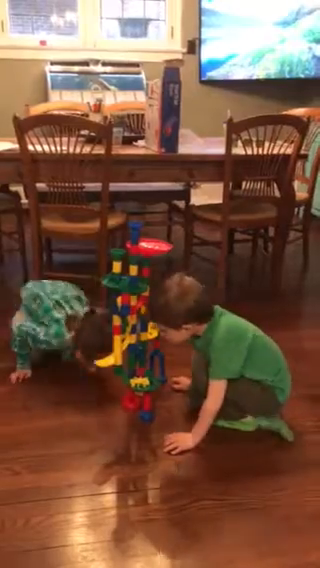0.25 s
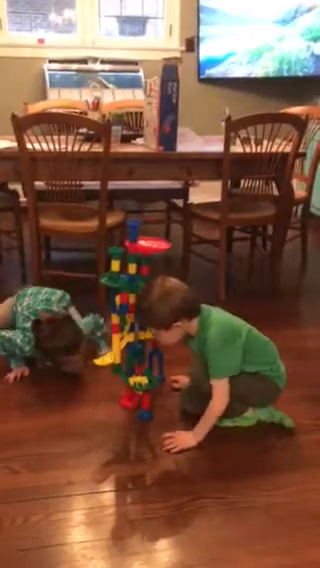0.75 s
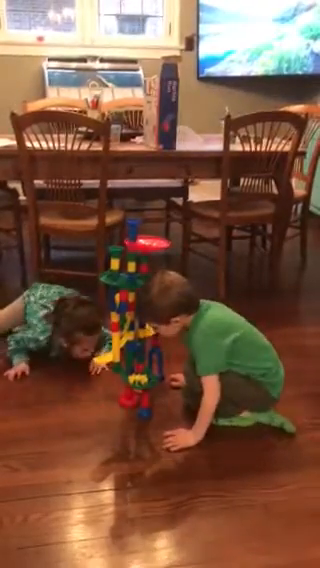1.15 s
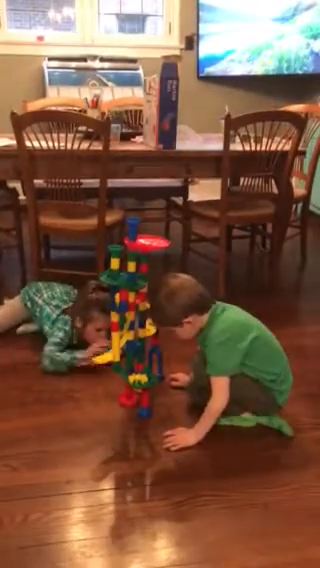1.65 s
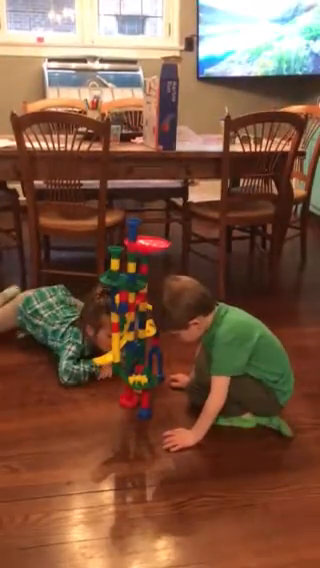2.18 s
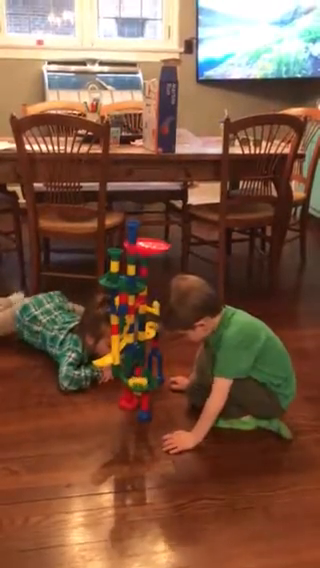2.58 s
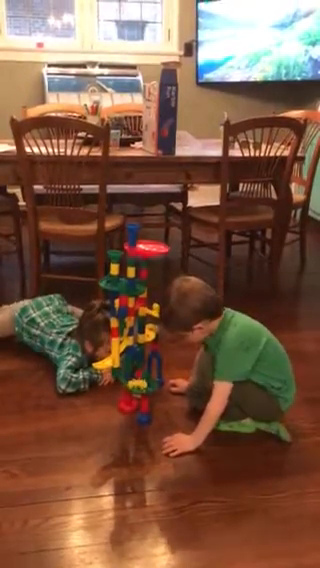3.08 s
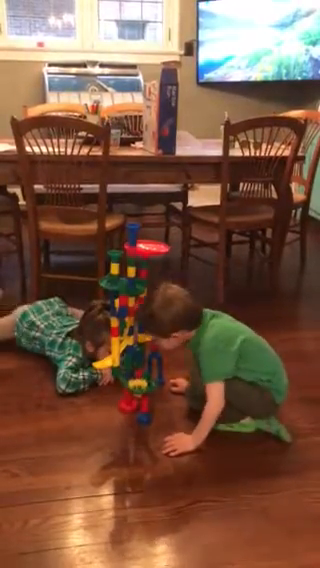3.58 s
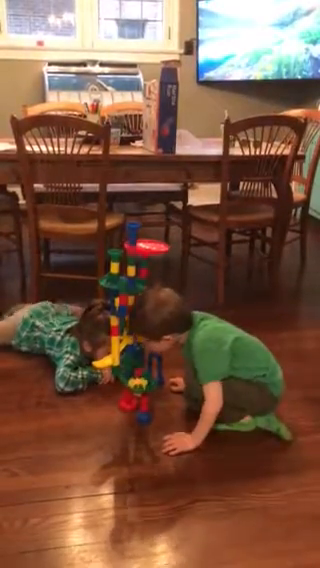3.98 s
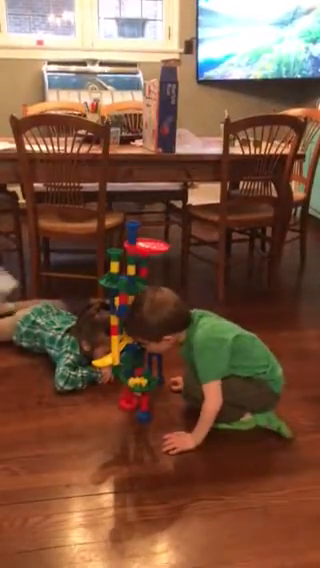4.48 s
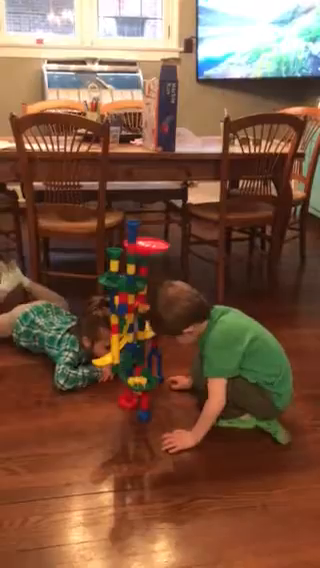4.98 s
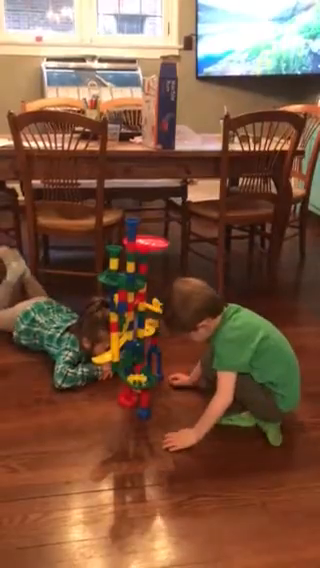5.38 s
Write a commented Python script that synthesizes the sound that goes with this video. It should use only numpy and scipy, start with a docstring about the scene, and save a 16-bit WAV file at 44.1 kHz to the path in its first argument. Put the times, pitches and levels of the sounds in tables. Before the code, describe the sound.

In a lively dining room with a wooden floor, marbles run down a plastic toy tower. The first second is quiet: faint rolling ticks, and soft low thumps from about 0.4 to 0.95 s as someone shifts, with a tiny scuff. From 1.0 to 1.3 s a sharp rattle of clacks breaks out, then a lull with one light tap near 1.5. The strongest, brightest clatter comes at 1.8 to 1.95 s, followed by a dense run of clicks from 2.2 to 2.7. Rolling dies to near quiet around 3 s. At 3.4 to 3.65 s heavier drops knock the hollow columns, then light regular ticks lead to a brisk cluster at 4.2 to 4.3. Another lull, small taps near 4.9, and a loud final clatter at 5.15 to 5.4 s, with dull floor bumps at the end. Short room echoes, soft air and very faint hum throughout; the microphone is a few steps away.

```python
"""Lively dining room, wooden floor: marbles clatter down the plastic tracks of a toy tower.
Each drop rings a thin plastic piece (dense noisy modes plus one ping) and the tower it is plugged into;
heavy drops also knock the hollow columns. Between drops the marbles roll and tick: coloured random taps.
Someone shifting on the floor makes soft thumps (low decaying sines) and scuffs (narrow hiss).
Echoes of shaped noise surround it all, over room air and a faint household hum."""
import sys
import numpy as np
from scipy import signal
from scipy.fft import rfft, irfft, next_fast_len
from scipy.io import wavfile

SR = 44100
rng = np.random.default_rng(int(sys.argv[2]) if len(sys.argv) > 2 else 0)


def generate_wav(signal):
    """Clip the signal to [-1, 1] and save it as 16-bit WAV at the path in sys.argv[1]."""
    frames = np.transpose(np.atleast_2d(signal))
    scaled = np.clip(frames, -1, 1) * 32767
    pcm = np.round(scaled).astype(np.int16)
    wavfile.write(sys.argv[1], SR, pcm)


N = 249165
TIME = np.arange(N) / SR

# marbles pass from piece to piece, arrival on each: [t/s]
ARRIVALS_S = [0, 1.7, 2.15, 2.56, 3.3, 3.73, 4.17, 4.7]


def from_db(db):
    """Decibels to amplitude ratio."""
    return 10 ** (np.asarray(db) / 20)


def rms_one(x):
    """Scales to rms 1."""
    return x / np.sqrt(np.mean(x ** 2) + 1e-20)


def at_hz(points, hz):
    """Reads a table on a log-frequency axis."""
    f, value = np.transpose(points)
    return np.interp(np.log(np.maximum(hz, 1)), np.log(f), value)


def coloured(x, spectrum):
    """Filters a noise by the spectrum; rms 1."""
    size = next_fast_len(len(x))
    hz = np.arange(size // 2 + 1) * SR / size
    gain = from_db(at_hz(spectrum, hz))
    return rms_one(irfft(rfft(x, size) * gain, size)[:len(x)])


def dying(t, t60_s):
    """Exponential decay, 60 dB down at t60."""
    return np.exp(-np.log(1000) * t / max(t60_s, 1e-3))


def resonance(x, hz, width_hz):
    """Two-pole resonance with gain 1 on top."""
    r = np.exp(-np.pi * width_hz / SR)
    zeros = np.array([1, 0, -1]) * (1 - r * r) / 2
    poles = [1, -2 * r * np.cos(2 * np.pi * hz / SR), r * r]
    return signal.lfilter(zeros, poles, x + 1e-18)


def add(out, start_s, sound):
    """Mixes a sound in at its start time."""
    i = max(round(start_s * SR), 0)
    out[i:i + len(sound)] += sound[:max(N - i, 0)]


def background():
    """Still room air (coloured noise) with a wavering hum (narrow-band noise)."""
    # air spectrum, relative: [f/Hz, density/dB]
    air_spectrum = [(25, -15), (60, 1.5), (100, -2.5), (220, 1), (400, -4.5), (700, -11), (1300, -13),
                    (1700, -15.5), (2300, -20.5), (4000, -26), (7000, -32.5), (10000, -34), (15500, -34.5)]
    # faint household hum: [f/Hz, width per pass/Hz, level/dB]
    hum_band = (240, 7.7, -72.5)
    air_db = -57.5
    hz, width_hz, hum_db = hum_band
    hum = rng.standard_normal(N)
    for _ in range(2):
        hum = resonance(hum, hz, width_hz)
    air = coloured(rng.standard_normal(N), air_spectrum)
    return from_db(air_db) * air + from_db(hum_db) * rms_one(hum)


def echoes(first_echo_s, build_s):
    """Wall echoes thicken into a diffuse tail, each band dying at its own rate; energy 1."""
    # reverberation time: [f/Hz, t60/s]
    room_t60 = [(100, 0.87), (800, 0.1161), (2100, 0.3259), (5500, .5), (9000, 0.147), (15000, 0.34)]
    # reverberation colour, relative: [f/Hz, level/dB]
    room_colour = [(100, -7), (800, 13), (2100, -0.5), (5500, -1.5), (9000, 3), (15000, -2.5)]
    t = TIME[:int(.7 * SR)]
    edges_hz = np.geomspace(40, 18000, 15)
    white = rng.standard_normal((2, len(t)))  # alternate bands share a noise
    tail = np.zeros(len(t))
    for k, (low, high) in enumerate(zip(edges_hz, edges_hz[1:])):
        bandpass = signal.butter(2, [low, high], "band", fs=SR, output="sos")
        band = signal.sosfilt(bandpass, white[k % 2])
        hz = np.sqrt(low * high)
        tail += band * from_db(at_hz(room_colour, hz)) * dying(t, at_hz(room_t60, hz))
    tail *= 1 - np.exp(-np.maximum(t - first_echo_s, 0) / build_s)
    return tail / np.sqrt(np.sum(tail ** 2))


def room(x, wet_db):
    """Each piece sits at another spot and so has an echo pattern of its own."""
    wet = np.zeros(N)
    stretches = np.split(x, [round(s * SR) for s in ARRIVALS_S[1:]])
    for start_s, stretch in zip(ARRIVALS_S, stretches):
        add(wet, start_s, signal.fftconvolve(stretch, echoes(first_echo_s=0.004, build_s=0.012)))
    return x + from_db(wet_db) * wet


def low_blows(blows, modes, contact_s):
    """Each blow sets the low modes of a large body swinging; a soft contact rounds the start."""
    out, t = np.zeros(N), TIME[:SR // 2]
    boom = np.zeros(len(t))
    for hz, db, t60_s in modes:
        boom += from_db(db) * np.sin(2 * np.pi * hz * t) * dying(t, t60_s)
    boom *= 1 - np.exp(-t / contact_s)
    for start_s, db in blows:
        add(out, start_s, from_db(db) * boom)
    return out


def floor_thumps():
    """Soft thumps excite the floorboard modes."""
    # thumps, gain on the modes: [t/s, gain/dB]
    thump_blows = [(0.407, -52), (.642, -44), (.692, -56), (.75, -62), (0.934, -55), (5.42, -52),
                   (5.475, -53)]
    # floorboard modes, relative: [f/Hz, level/dB, t60/s]
    board_modes = [(48, -50, .35), (68.4, -2, 0.4), (84.3, 11.5, 0.12), (117, 1, 0.19), (139.4, 6, 0.094),
                   (197, -28, 0.053)]
    return low_blows(thump_blows, board_modes, contact_s=0.0031)


def scuffs():
    """Brief rubs, each a narrow high hiss that swells and fades."""
    # scuffs: [t/s, level before envelope/dB, f/Hz, width per pass/Hz, length/s]
    rubs = [(0.895, -50, 8100, 1550, 0.03), (2.192, -43, 12390, 1993, .022)]
    out, t = np.zeros(N), TIME[:SR // 10]
    for start_s, db, hz, width_hz, length_s in rubs:
        hiss = rng.standard_normal(len(t))
        for _ in range(2):
            hiss = resonance(hiss, hz, width_hz)
        envelope = np.sin(np.pi * np.sqrt(np.minimum(t / length_s, 1)))
        add(out, start_s, from_db(db) * rms_one(hiss) * envelope)
    return out


def column_knocks():
    """Heavy drops also knock the hollow columns."""
    # knocks, gain on the modes: [t/s, gain/dB]
    knock_blows = [(2.613, -45), (3.507, -43), (3.522, -41), (3.538, -41), (3.626, -42.5)]
    # column modes, relative: [f/Hz, level/dB, t60/s]
    column_modes = [(337, -3, 0.097), (392, -1, 0.077), (534, -31, 0.05), (680, 0, 0.057),
                    (746, 4.5, 0.029), (960, 4, 0.024)]
    return low_blows(knock_blows, column_modes, contact_s=0.0011)


def tower(x, coupling_db, width_hz):
    """Every contact also feeds the longer-lived modes of the whole tower."""
    # modes of the assembled tower, relative: [f/Hz, level/dB]
    tower_modes = [(1044, -47), (1308, -51.5), (1696, -59), (2132, -54), (2606, -63), (2880, -55.5),
                   (3165, -51)]
    strongest_db = max(db for hz, db in tower_modes)
    ringing = np.zeros(N)
    for hz, db in tower_modes:
        ringing += from_db(db - strongest_db + coupling_db) * resonance(x, hz, width_hz)
    return x + ringing


def taps(per_s, spread_db, t60_s, spectrum):
    """Random small contacts of uneven strength, each with a brief noisy ring; rms 1."""
    hits = rng.random(N) < per_s / SR
    strength = from_db(spread_db * np.minimum(rng.exponential(1, N), 3))
    clicks = hits * rng.choice([-1, 1], N) * strength
    t = TIME[:SR // 40]
    ring = rng.standard_normal(len(t)) * dying(t, t60_s)
    return coloured(signal.fftconvolve(clicks, ring)[:N], spectrum)


def rolling(skip_db, skip_growth, drone_db):
    """A marble murmurs over bumps, makes the track ring and drone, and skips more in a louder roll."""
    # murmur colour, relative: [f/Hz, density/dB]
    murmur_colour = [(200, -28), (500, -18.5), (1000, -8.5), (1350, -10), (1620, 1), (1950, -5.5),
                     (2500, -3.5), (3150, -9.5), (4600, -16.5), (7000, -21), (15000, -30)]
    # track drone colour, relative: [f/Hz, density/dB]
    drone_colour = [(250, -28), (550, -10.5), (800, 4.5), (1050, 4), (1350, 0.5), (2000, -29)]
    # skip colour, relative: [f/Hz, density/dB]
    skip_colour = [(500, -19.5), (1600, 0.5), (2500, 0.5), (3000, -19.5), (3600, 0.5), (4600, 10),
                   (5200, -21), (9300, -2.5), (15000, -25.5)]
    # track modes kept ringing, resonance gain: [f/Hz, width/Hz, gain/dB]
    track_modes = [(1040, 60, -8), (1310, 58, -11), (1686, 100, -2), (2116, 80, -4.5), (2780, 100, -11),
                   (4590, 56, -2.5)]
    # rolls: [t/s, length before fade/s, gain/dB, stretch's own note/Hz, treble shelf/dB]
    rolls = [(0, 0.049, -61, 1720, 3), (0.145, .12, -56.5, 1660, -12), (0.376, 0.35, -71, 1670, -5),
             (0.427, 0.047, -54.5, 1640, -1.5), (0.732, 0.061, -53.5, 1720, -4.5),
             (1.02, 0.095, -45.5, 4586, 4), (1.216, 0.12, -39, 2080, -1.5),
             (1.502, 0.095, -51.5, 1930, -1.5), (1.703, 0.041, -58, 1800, -8),
             (1.828, 0.02, -37.5, 1720, 0.5), (1.975, .04, -43.5, 3870, 5), (2.136, .19, -52.5, 2575, 2),
             (2.509, 0.23, -49.5, 3170, 0), (3.106, 0.34, -62.5, 3163, -11), (3.457, 0.32, -54.5, 3240, 4),
             (3.851, 0.27, -56, 2100, -4), (4.245, 0.12, -49.5, 2120, -5), (4.712, 0.027, -63, 1690, 2),
             (4.834, 0.043, -54, 1707, -4.5), (4.97, 0.17, -57.5, 1700, -4), (5.192, .24, -42.5, 2083, -4)]
    attack_s, fade_db_per_s = 0.025, 119
    skip_ref_db = -38.5  # roll gain at which skips stand at skip_db
    note_width_hz, note_db, treble_hz = 130, -11, 3000

    bumps = taps(per_s=1100, spread_db=3.0, t60_s=0.0095, spectrum=murmur_colour)
    murmur = bumps.copy()
    for hz, width_hz, db in track_modes:
        murmur += from_db(db) * resonance(bumps, hz, width_hz)
    murmur = rms_one(murmur)
    drone = from_db(drone_db) * taps(per_s=900, spread_db=3.0, t60_s=0.01, spectrum=drone_colour)
    skips = from_db(skip_db) * taps(per_s=140, spread_db=0.7, t60_s=0.009, spectrum=skip_colour)

    out = np.zeros(N)
    highpass = signal.butter(1, treble_hz, "high", fs=SR)
    for start_s, length_s, db, note_hz, treble_db in rolls:
        span = slice(max(round(start_s * SR), 0), round((start_s + length_s + .5) * SR))
        t = TIME[span] - start_s
        fade_db = fade_db_per_s * np.maximum(t - length_s, 0)
        gain = from_db(db - fade_db) * np.clip(t / attack_s, 0, 1)
        note = from_db(note_db) * rms_one(resonance(bumps[span], note_hz, note_width_hz))
        skip_gain = (gain / from_db(skip_ref_db)) ** abs(skip_growth)
        sound = murmur[span] + drone[span] + note + skip_gain * skips[span]
        treble = signal.lfilter(*highpass, sound)
        add(out, start_s, gain * (sound + (from_db(treble_db) - 1) * treble))
    return out


def plastic_piece(spectrum, peaks, uneven_db, size=4096, spacing=4):
    """Dense modes of a thin piece, strongest near its resonances, drawn anew per impact: body, treble."""
    bins = np.arange(spacing, size // 2 - spacing, spacing)
    bins = bins + rng.integers(0, spacing, len(bins))
    hz = bins * SR / size
    strength_db = at_hz(spectrum, hz) + uneven_db * rng.standard_normal(len(bins))
    for centre_hz, width_hz, height_db in peaks:
        strength_db += height_db / (1 + (2 * (hz - centre_hz) / width_hz) ** 2)
    lines = np.zeros(size // 2 + 1, complex)
    lines[bins] = from_db(strength_db) * np.exp(2j * np.pi * rng.random(len(bins)))
    line_hz = np.arange(len(lines)) * SR / size
    treble = 1 / (1 + (6500 / np.maximum(line_hz, 1)) ** 6)  # crossover at 6.5 kHz
    return irfft([lines * (1 - treble), lines * treble]) * np.sqrt(size * spacing)


def ping(t, hz, cycles):
    """One mode near the point of impact; t60 is a number of its cycles."""
    return np.sin(2 * np.pi * hz * t) * dying(t, cycles / hz)


def strike(t, piece, force_db, clack_db, click_db, ping_hz):
    """The marble chatters on the wall for a few ms, then the piece rings out, its treble dying first."""
    # centres of hollow, clack, level, click and snap: [f/Hz]
    band_hz = [680, 1700, 3700, 7800, 12600]
    # build by piece: [hollow re clack/dB, snap re click/dB]
    builds = [(-9, -4), (-9, -6), (-9, -6.5), (0.5, -1.5), (4, 0), (1.5, -3.5), (-2.5, -7.5), (-6, -8)]
    # ring time of the body by piece: [t60/s]
    ring_t60_s = [0.057, 0.048, 0.052, 0.05, 0.053, 0.049, 0.05, 0.043]
    # resonances of each piece, in order of arrival: [f/Hz, width/Hz, height/dB]
    piece_a = [(1680, 260, 6.5), (2920, 450, 7.5), (3770, 290, 8), (4400, 210.0, 1.5), (4560, 170, -0.5),
               (5570, 900, 7), (9000, 210, 5.5)]
    piece_b = [(1640, 360, 4.3), (2660, 100, 12.7), (3029.4, 160, 8.7), (3770, 360.0, 2.6), (4520, 380, 5),
               (6200, 580, 4.8), (8750, 600, 2.7)]
    piece_c = [(1880, 200, 5.4), (2630, 190, 4.8), (3320, 780, 6.2), (3960, 450, 3.8), (5790, 200, 6.8),
               (9500, 260, 1.8), (12900, 330, 5.5)]
    piece_d = [(1010, 143, 7.1), (2530, 130, 11), (2900, 100, 2.4), (3230, 1300, 4.7), (4500, 230, 6.9),
               (5200, 410, 5.7), (8400, 440, 12)]
    piece_e = [(1600, 167, 8.8), (2579, 370, 7.9), (3205, 510, 5.52), (3960, 280.0, 1.78),
               (6351, 352, 4.57), (7203, 240, 9), (9300, 190, 4.3)]
    piece_f = [(1289, 60, 3.61), (1565.5, 260, 12), (2069, 74, 6.7), (3120.0, 420, 8), (5117, 810, 11.6),
               (6900, 405, 9.1), (9060, 320, 10.6)]
    piece_g = [(1370, 650, 6.2), (2520, 220, 7.7), (3170.0, 300, 6.9), (4142, 120, 9.4), (4730, 270, 4.3),
               (6758, 190, 5.1), (9150.0, 200, 6.2)]
    piece_h = [(1780, 69, 4.32), (2250, 160, 2.8), (3320, 336, 5.2), (3900, 240, 4.76), (4460, 160, 2.9),
               (6143, 550, 5.84), (6585, 119, 1.676)]
    peaks = [piece_a, piece_b, piece_c, piece_d, piece_e, piece_f, piece_g, piece_h][piece]
    chatter_s, rise_s, treble_life = 0.0044, 0.00018, 0.56  # treble_life: share of the body's t60
    bass_db, belly_db, top_db, treble_gain_db = -34, -1.5, -8.5, 6.5
    snap_growth = 0.16  # dB/dB: a harder strike is a shorter contact and snaps more
    usual_ping_db, ping_growth = -4.5, 0.26  # dB/dB: a softer strike's ping stands out more

    hollow_re_clack_db, snap_re_click_db = builds[piece]
    hollow_db = clack_db + hollow_re_clack_db
    snap_db = click_db + snap_growth * force_db + snap_re_click_db
    spectrum = sorted([(200, hollow_db + bass_db),
                       (1020, (hollow_db + clack_db) / 2 + belly_db),
                       (16000, snap_db + top_db),
                       *zip(band_hz, [hollow_db, clack_db, 0, click_db, snap_db])])
    body, treble = plastic_piece(spectrum, peaks, uneven_db=2.5, size=len(t))
    t60_s = ring_t60_s[piece]
    sound = body * (1 - np.exp(-t / rise_s)) * dying(np.maximum(t - chatter_s, 0), t60_s)
    sound += from_db(treble_gain_db) * treble * dying(t, t60_s * treble_life)
    ping_db = usual_ping_db - ping_growth * force_db
    return sound + from_db(ping_db) * ping(t, ping_hz, cycles=182)


def strikes(gain_db, size=4096):
    """Each drop strikes the piece that the marble has reached; some bounce once and strike it again."""
    # strikes: [t/s, relative level at 3.7 kHz/dB, clack re level/dB, click re level/dB, ping f/Hz,
    # time to rebound/s (up to 3 ms: none sounded)]
    hits = [(0.4467, -57, 11, -10, 1633, 0.0059), (0.7196, -60, 3, 0, 6890, 0),
            (1.039, -56, 0, -18, 1700, 0.0028), (1.0533, -44, 5, -17, 4600, 0.00066),
            (1.1016, -41, -5, -10, 2930, 0.011), (1.1365, -42.5, -1, -7, 1600, 0.00014),
            (1.1799, -35, 6.5, -8, 1693, 0.00079), (1.1912, -29.5, -2.5, -7.5, 2156, 0.011),
            (1.2733, -30.5, 5, -12, 2970, 0.0029), (1.5267, -47.5, 4, -5, 1984, 0.0051),
            (1.7787, -39, 0, -8, 1634, 0.0003), (1.7978, -42, 6.5, -7, 3943, 0.0026),
            (1.8293, -41, 6, -10, 2565, 0), (1.8355, -33, -1.5, -9.5, 2580, .0137),
            (1.9108, -25, -1.5, -4.5, 3800, .005), (1.9483, -25.5, -13.5, -16, 2826, 0),
            (2.1812, -45, 0, 2, 9265, 0.016), (2.2041, -52, -4, 11, 2700, 0.00015),
            (2.2108, -33.5, -2, -10, 2600, 0.00079), (2.3452, -47, -5, -11, 2540, 0.00042),
            (2.3791, -29.5, -3, -6, 3650, 0.00017), (2.4059, -41.5, 3, -16, 2090, 0.00011),
            (2.454, -29.5, -2.5, -8.5, 3810, 0.0015), (2.4632, -30, 1, -3, 3870, 0),
            (2.518, -32, -1, -11, 3410, 0.008), (2.579, -50.5, -12, -2, 3430, 0.00093),
            (2.6124, -32.5, -2.5, -2, 3630, 0.0011), (2.7066, -40, -2.5, -2, 4182, 0.00063),
            (2.7668, -58, 0, 12, 8150, 0.001), (2.79, -58.5, 6, 6, 1955, 0.00063),
            (3.4048, -40.5, -8, -17.5, 2599, 0.00029), (3.4484, -32.5, -8, -7.5, 2606, 0.0015),
            (3.4779, -38, -10, -18, 6130, 0.00095), (3.5065, -28, -9.5, -16, 3450, 0),
            (3.5209, -37.5, 0, -6.5, 1650, 0), (3.5378, -34, -9.5, -12, 3410, 0.00069),
            (3.589, -34.5, -9.5, -18, 3090, 0.0015), (3.6265, -38.5, -9, -20, 3324, 0),
            (3.6507, -38, -20, -18, 3160, 0.0051), (3.7602, -57.5, -1, -2, 1617, 0.01),
            (3.8416, -50.5, -0.5, -7.5, 2162, 0.0034), (3.9088, -49, -1.5, -3.5, 3125, 0.012),
            (3.9726, -47, -0.5, -7.5, 3100, 0.017), (4.027, -49.5, 2, -4.5, 2149, 0.0098),
            (4.0812, -49.5, 3, -6.5, 1658, 0.015), (4.1389, -53, 4.5, -24, 2574, 0.00032),
            (4.1898, -37, -1, -11, 2600, 0.00051), (4.2064, -39, -3, -6, 2580, 0.0014),
            (4.226, -32, -0.5, -9, 4556, 0.016), (4.2624, -51, -5, -1, 2150, 0.00092),
            (4.291, -38, -2.5, -10, 4200, 0.0058), (4.3332, -45, 1.5, -5.5, 3384, 0.00068),
            (4.8692, -51.5, 5, -8.5, 1739, 0.002), (4.9628, -50.5, 6.5, -8.5, 1660, 0.015),
            (4.999, -54, 4, -13, 1728, 0), (5.1484, -38.5, 6.5, -3, 3619, 0.015),
            (5.2044, -43, 5, -6, 6580, 0.00069), (5.2128, -27, -4.5, -11.5, 3499, 0.00012),
            (5.2294, -36, 2.5, -4, 4630, 0.0025), (5.2554, -29.5, -0.5, -11.5, 1947, 0.00037),
            (5.3421, -35, 8, 1, 3130, 0), (5.3931, -40, 7, -11, 2261, 0)]
    usual_db, rebound_loss_db, min_rebound_s = -37.5, 5.5, .003
    out = np.zeros(N)
    for hit_s, db, clack_db, click_db, ping_hz, rebound_s in hits:
        piece = np.searchsorted(ARRIVALS_S, hit_s) - 1
        touches = [(hit_s, db)]
        if rebound_s > min_rebound_s:
            touches.append((hit_s + rebound_s, db - rebound_loss_db))
        for touch_s, touch_db in touches:
            sound = strike(TIME[:size], piece, db - usual_db, clack_db, click_db, ping_hz)
            add(out, touch_s, from_db(touch_db + gain_db) * sound)
    return out


def scene():
    """Tower and floor sound into the room, over its steady background."""
    contacts = rolling(skip_db=-0.5, skip_growth=0.73, drone_db=-11) + strikes(gain_db=8.5)
    marbles = tower(contacts, coupling_db=-7, width_hz=37) + column_knocks()
    direct = floor_thumps() + scuffs() + marbles
    return (background() + room(direct, wet_db=-6.5))[None]


def record(dry):
    """The microphone drops the deepest bass, its port hollows out a treble band; the top is cut steeply."""
    bass_cut = signal.butter(2, 32, "high", fs=SR, output="sos")
    heard = signal.sosfilt(bass_cut, dry)
    heard = heard - from_db(-6.5) * resonance(heard, hz=10380, width_hz=620)
    top_cut = signal.ellip(10, .3, 80, 15900, fs=SR, output="sos")  # 0.3 dB ripple, 80 dB stopband
    return signal.sosfilt(top_cut, heard)


dry = scene()
out = record(dry)
generate_wav(out)
```